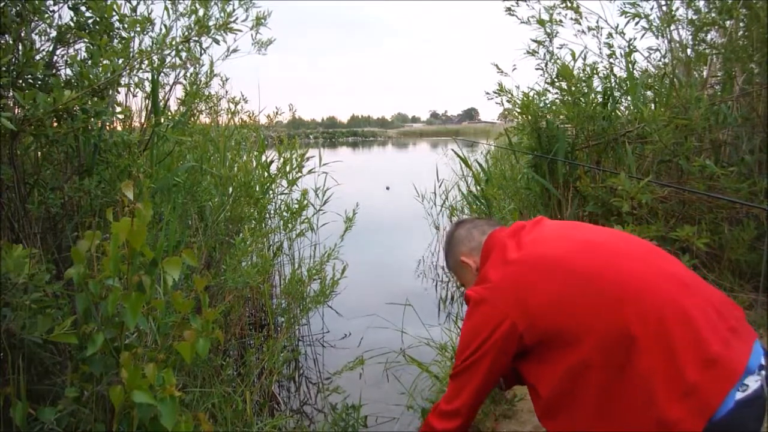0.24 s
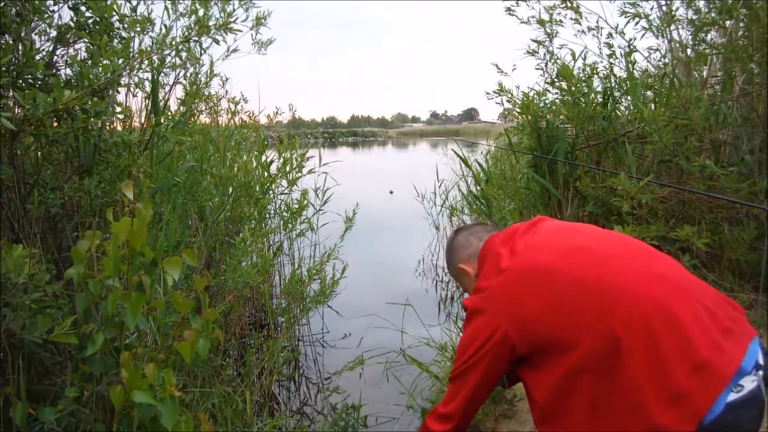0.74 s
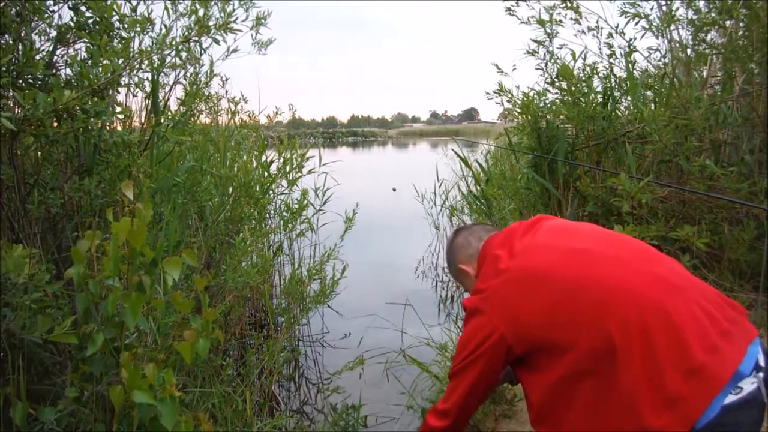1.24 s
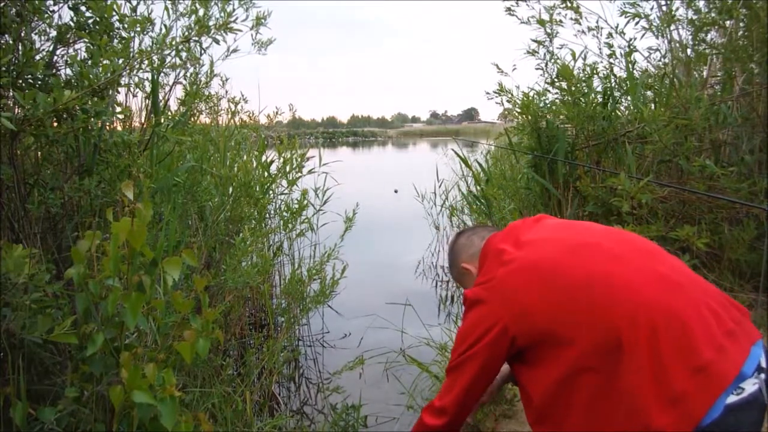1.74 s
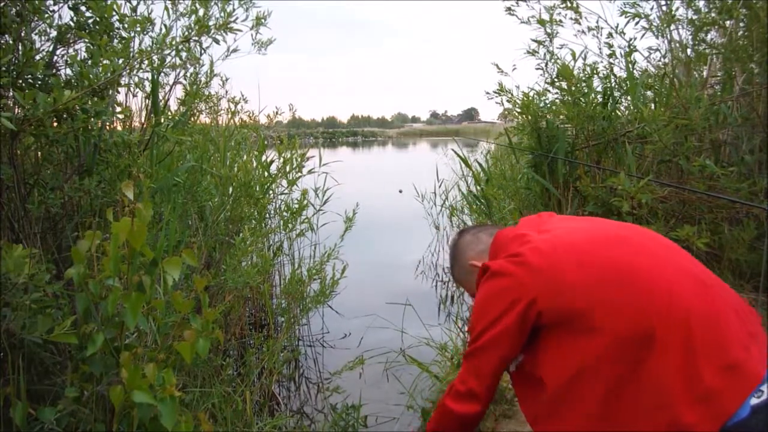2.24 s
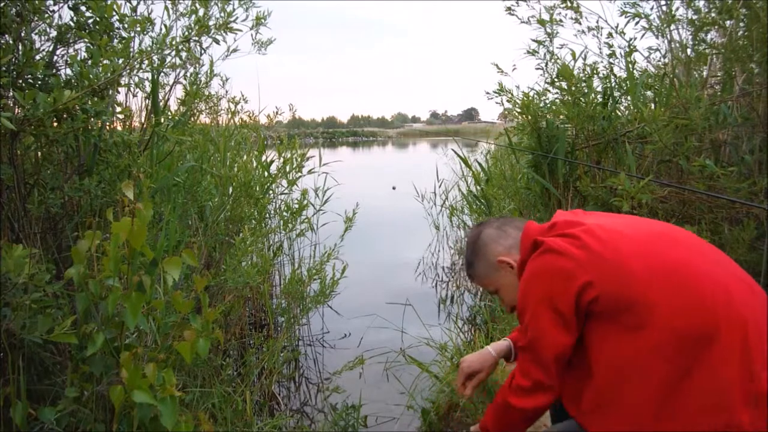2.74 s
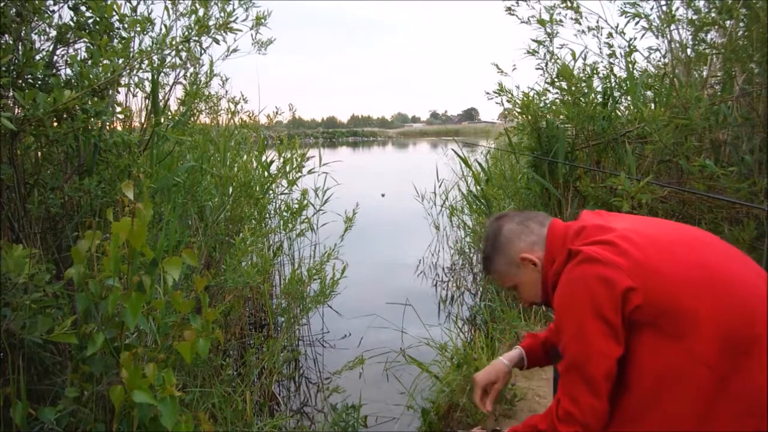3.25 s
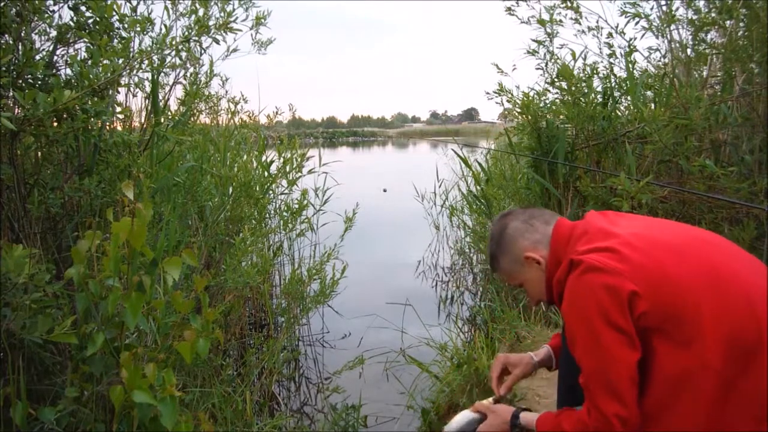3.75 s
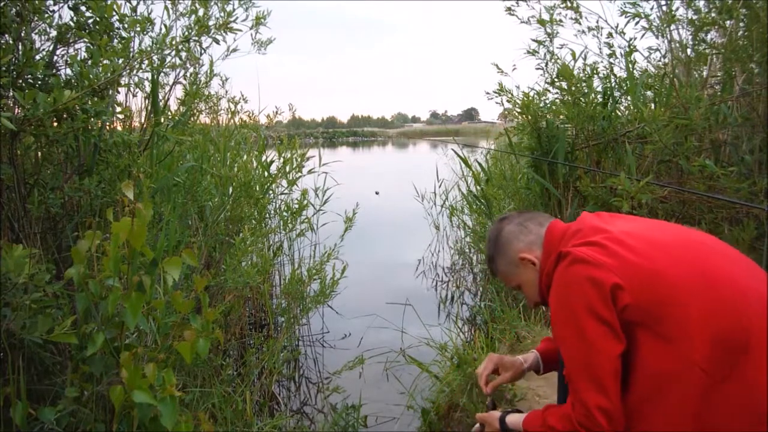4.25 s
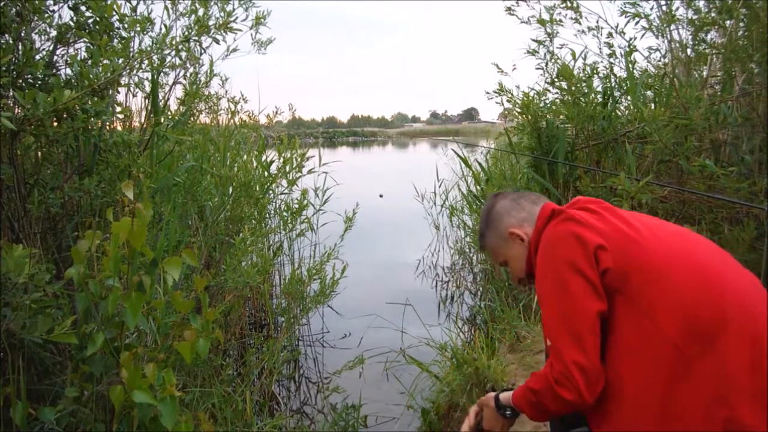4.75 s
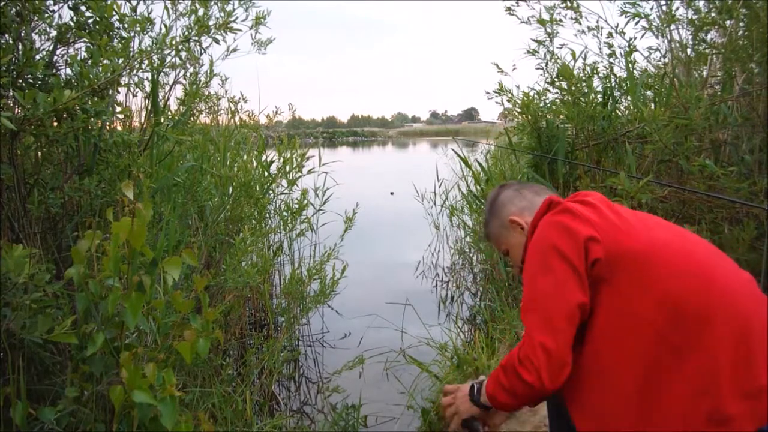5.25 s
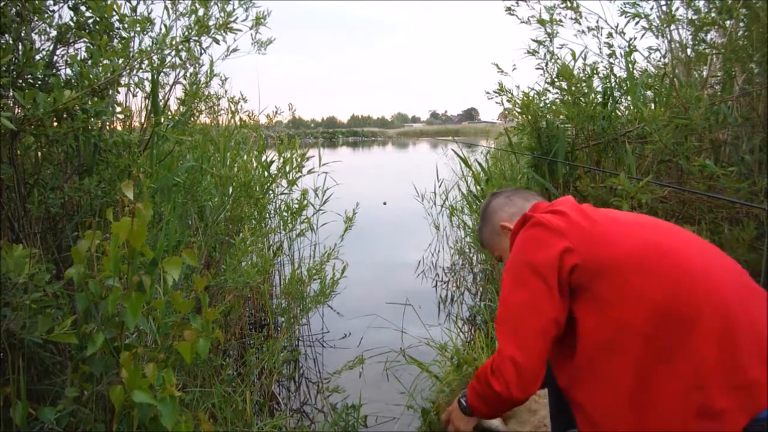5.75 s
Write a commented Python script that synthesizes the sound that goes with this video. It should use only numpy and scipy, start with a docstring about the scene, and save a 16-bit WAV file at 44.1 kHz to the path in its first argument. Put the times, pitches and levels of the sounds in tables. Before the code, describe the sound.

A colony of gulls screams without pause across a lake, nearer cries standing out over faint grass rustling and small clicks.

```python
"""A colony of water birds, most likely gulls, screams without pause across a reedy lake.
Heard from the bank, the nearer birds stand out with arched cries, clear or rasping: pulses from the
syrinx, shaped by throat and beak. The rest merge into one wavering band; another bird pipes thinly.
At the microphone someone crouching rustles the grass and makes a few small clicks, and the camera
adds a faint pulsing whine. Behind it all lies the steady wash of the open lakeside."""
import sys
import numpy as np
from scipy import signal
from scipy.fft import rfft, irfft, next_fast_len
from scipy.io import wavfile
from scipy.ndimage import uniform_filter1d

SR = 44100
rng = np.random.default_rng(int(sys.argv[2]) if len(sys.argv) > 2 else 0)


def store_wav(level_fs):
    """Save 16-bit WAV to argv[1]."""
    pcm = np.round(np.clip(np.atleast_2d(level_fs), -1, 1) * 32767)
    wavfile.write(sys.argv[1], SR, pcm.T.astype(np.int16))


N = 264379
TIME = np.arange(N) / SR


# Each row: start in seconds, length in seconds, top pitch in Hz, climb and drop as shares of that pitch,
# throat level in dB, rasp from 0 to 1, brightness in dB per octave, lower beak resonance in Hz and its
# level in dB, upper beak resonance in Hz and its level in dB.
GULL_CRIES = [ (-.06, 0.21, 960, .05, 0.026, -48, 0.7, -22, 3800, -70, 5600, -75),
              (.27, 0.28, 1069, 0.068, 0.028, -46.5, 0.37, -32, 4300, -61, 6500, -75),
              (.52, .29, 1076, .04, 0.049, -49, 0.68, -11, 2950, -53.5, 5400, -60.5),
              (.58, 0.15, 1012, 0.038, 0.011, -64, 0.19, -26, 4050, -64, 5000, -57),
              (.78, 0.23, 1036, 0.034, 0.053, -50, 0.79, -24, 3670, -67, 5000, -67),
              (0.989, .21, 1088, 0.094, 0.016, -47, 0.26, -24, 4400, -58, 5300, -69),
              (1.12, 0.49, 1174, 0.057, 0.053, -55, 0.96, -20, 2700, -50.5, 3840, -57.5),
              (1.18, 0.17, 996, 0.031, 0.013, -51, .15, -3, 4860, -55, 5630, -56),
              (1.26, .21, 1022, 0.018, 0.082, -49.5, .75, -5, 4060, -73, 5050, -57),
              (1.39, 0.26, 1060, 0.016, 0.091, -46.5, 0.83, -38, 4100, -76, 5300, -64),
              (1.815, 0.23, 973, .035, 0.059, -45.5, 0.48, -18, 3930, -57, 5830, -56.5),
              (1.85, 0.23, 1078, 0.029, 0.034, -54, .9, -10, 3000, -63, 5340, -59),
              (2, 0.22, 1087, 0.0083, 0.054, -53, 0.63, -23, 3800, -61, 5250, -61),
              (2.05, 0.23, 977, 0.012, 0.031, -48.5, 0.29, -32, 3800, -62, 5200, -77),
              (2.27, 0.24, 1012, 0.026, 0.029, -47.5, 0.8, -24, 4000, -67, 5200, -71),
              (2.52, 0.24, 1070, 0.077, 0.05, -44.5, 0.45, -38, 4070, -54, 5100, -57),
              (2.45, 0.29, 1108, 0.043, 0.034, -52, 0.69, -24, 3900, -60, 5560, -56.5),
              (2.74, .2, 963, 0.0089, 0.072, -46, 0.32, -33, 4000, -59.5, 6100, -65),
              (2.92, 0.21, 1029, 0.026, 0.017, -56, .7, -16, 4230, -69, 5500, -61.5),
              (3.085, 0.23, 1082, .04, 0.017, -47.5, 0.66, -19, 4030, -53, 7200, -65),
              (3.11, .2, 940, 0.044, 0.047, -51, 1, -9, 4750, -54, 6300, -61.5),
              (3.28, 0.21, 1035, 0.012, 0.16, -46.5, 0.29, -32, 4300, -56.5, 6550, -65.5),
              (3.57, .13, 1097, .046, 0.023, -47, 0.72, -11, 4430, -57, 6160, -74),
              (3.75, .3, 1052, 0.056, 0.043, -48.5, .3, -22, 2940, -57, 5200, -60),
              (3.79, 0.24, 1152, .04, 0.037, -56, 0.72, -24, 4400, -53.5, 6820, -63.5),
              (3.78, 0.22, 929, .04, 0.029, -49.5, 0.7, -24, 3760, -60, 6400, -65),
              (3.99, .2, 1060, 0.0039, 0.17, -43.5, 0.18, -42, 4060, -54.5, 6700, -74),
              (4.15, 0.16, 866, 0.0048, 0.062, -48, .15, -34, 3770, -65, 6500, -71),
              (4.35, 0.18, 1065, 0.0083, .13, -45.5, 0.22, -3, 5450, -57, 8600, -68.5),
              (4.37, .14, 1138, .01, 0.12, -55, 0.33, -11, 4600, -54.5, 5670, -60),
              (4.35, 0.22, 932, 0.026, 0.12, -51, .3, -14, 2900, -58, 3680, -57.5),
              (4.49, 0.099, 990, 0.024, 0.024, -45.5, 0.95, -32, 4000, -74, 5500, -63),
              (4.63, 0.2, 1118, 0.037, 0.034, -49, 0.66, -20, 4500, -55, 6450, -65),
              (4.68, 0.26, 1010, 0.0055, .06, -45.3, 0.43, -37, 2900, -60, 4130, -54.5),
              (4.88, .15, 1087, 0.0072, 0.052, -48, .45, -18, 4100, -51.5, 6400, -68),
              (4.99, 0.22, 1056, .03, 0.032, -45.5, 0.56, -9, 4750, -55.5, 5400, -58.5),
              (5.12, 0.25, 1087, 0.018, 0.041, -51, 0.63, -15, 2690, -58, 5540, -62),
              (5.25, 0.25, 1069, 0.0077, .14, -45, .15, -9.5, 4470, -53, 6050, -60.5),
              (5.42, 0.24, 938, 0.0041, 0.082, -44.5, 0.15, -43, 4280, -61.5, 5250, -69),
              (5.53, 0.17, 866, 0.0047, .08, -50, 0.25, -36, 4300, -63, 5200, -77),
              (5.65, 0.11, 937, 0.037, .014, -55, 0.61, -23, 4700, -57, 5670, -58),
              (5.74, 0.15, 936, 0.026, 0.044, -47.5, 0.89, -28, 3760, -60, 5050, -61),
              (5.89, 0.17, 1084, 0.087, 0.021, -43.5, 0.4, -13, 4400, -53, 7340, -78), ]

def near_gulls():
    """The birds nearest the microphone, each cry standing clear of the colony."""
    out = np.zeros(N)
    for start, *shape in GULL_CRIES:
        add(out, start, cry(*shape))
    return out


def cry(length, top_hz, climb, drop, db, rasp, bright_db, lower_hz, lower_db, upper_hz, upper_db):
    """One near cry: the throat tone plus two beak resonances that rise and fall with the pitch."""
    t, hz, swell = arch(length, top_hz, climb, drop)
    drive = syrinx(t, hz, rasp)
    opening = (hz / top_hz) ** .8
    lower = amp(lower_db) * unit(beak(drive, lower_hz * opening))
    upper = amp(upper_db) * unit(beak(drive, upper_hz * opening))
    return swell * (amp(db) * throat(drive, bright_db) + lower + upper)


def arch(length, top_hz, climb, drop, attack_s=.02, release_s=.042):
    """Time, pitch and swell of a call that climbs and drops again; the larger move takes longer."""
    t = np.arange(int(length * SR)) / SR
    climb, drop = np.maximum([climb, drop], 1e-3)
    crest = np.sqrt(climb) / (np.sqrt(climb) + np.sqrt(drop))
    before = np.maximum(1 - t / length / crest, 0)
    after = np.maximum((t / length - crest) / (1 - crest), 0)
    hz = top_hz * (1 - climb * before ** 1.7 - drop * after ** 1.5)
    ramp = np.minimum(t / attack_s, (length - t) / release_s)
    return t, hz, np.sin(np.pi / 2 * np.minimum(ramp, 1)) ** 2


# The voice breaks as it grows rough. Each row: rasp, period doubling, both from 0 to 1.
VOICE_BREAK = [(.1, .1), (.2, .5), (1, .65)]

def syrinx(t, hz, rasp, harmonics=11, flutter_hz=68.25, flutter_db=7.5):
    """Pulses at the cry's pitch; rasp shakes them, splits them into strong and weak, and adds hiss."""
    flutter_turns = np.cumsum(flutter_hz * (1 + .06 * wander(t, 40))) / SR
    flutter = np.sin(2 * np.pi * (flutter_turns + rng.random()))
    hz = hz * (1 + .005 * wander(t, 70) + rasp * (.03 * flutter + .028 * wander(t, 900)))
    turns = np.cumsum(hz) / SR + 2 * rng.random()
    offset = turns % 1 - .5
    pulses = np.sinc((2 * harmonics + 1) * offset) / np.sinc(offset)
    doubling = np.interp(rasp, *np.transpose(VOICE_BREAK))
    pulses *= 1 + doubling * (np.sin(np.pi * turns) + .5 * wander(t, 1000))
    puffs = np.cos(np.pi * offset) * rng.standard_normal(len(t))
    shake = amp(flutter_db * rasp * flutter + 1.6 * wander(t, 45))
    return (unit(pulses) + .5 * rasp * unit(puffs)) * shake


# A gull's throat. Each row: frequency in Hz, gain in dB.
THROAT_COLOUR = [(450, -50), (1000, -24.5), (1450, -15), (1750, 0.5), (2100, -1.5), (2600, -7.5),
                 (3200, -10), (3900, -7), (4600, -14), (5400, -17), (6200, -12), (7000, -24), (8200, -12),
                 (9000, -25), (11000, -52)]

def throat(drive, bright_db):
    """The throat brings out the second harmonic; a duller cry loses more above it."""
    def gain_db(hz):
        octaves_above = np.log2(np.maximum(hz / 2200, 1))
        return read(THROAT_COLOUR, hz) + bright_db * octaves_above - 40 * (hz < 300)
    return unit(coloured(drive, gain_db, lag=1.5e-7))


def beak(drive, hz, width_hz=750):
    """A steep resonance of the beak that follows the curve hz."""
    carrier = np.exp(2j * np.pi * np.cumsum(hz) / SR)
    pole = np.exp(-np.pi * width_hz / SR)
    ringing = signal.lfilter([(1 - pole) ** 2], [1, -2 * pole, pole * pole], drive / carrier)
    return 2 * (carrier * ringing).real


# Each row: start in seconds, length in seconds, top pitch in Hz, level in dB.
PIPING_NOTES = [(.01, .15, 3260, -56.5), (0.158, .14, 3220, -62), (3.418, 0.21, 3360, -57.5),
                (4.805, 0.15, 3380, -60), (4.91, .13, 3200, -54.5), (5.08, 0.15, 3390, -62),
                (5.297, 0.11, 3370, -58)]

def piping_bird():
    """Another bird near the bank pipes thin, slightly arched, almost pure notes."""
    out = np.zeros(N)
    for start, length, top_hz, db in PIPING_NOTES:
        t, hz, swell = arch(length, top_hz, climb=.0448, drop=.0436)
        turns = np.cumsum(hz * (1 + .0025 * wander(t, 298))) / SR
        add(out, start, amp(db) * swell * unit(np.sin(2 * np.pi * turns)))
    return out


# The long path across the lake. Each row: frequency in Hz, gain in dB.
LAKE_PATH = [(500, 14), (1000, 10), (1350, 17), (1700, 7), (2100, 5.5), (2600, 4), (4000, -4), (6000, -7.5),
             (7200, -17), (9000, -40)]

def far_colony(near, count=420, island_count=5, mean_hz=920, spread=.19, glide=.16, level_db=-43.5):
    """Hundreds of cries from distant nesting islands, dulled and blurred on their way to the bank."""
    islands = np.zeros((island_count, N))
    for k, (when, long, high, faint, harsh, rising) in enumerate(rng.random((count, 6))):
        top_hz = mean_hz * (1 + spread * (2 * high - 1))
        t, hz, swell = arch(.18 + .2 * long, top_hz, glide * rising, glide * (1 - rising))
        voice = throat(syrinx(t, hz, rasp=.438 + .5 * harsh), bright_db=0)
        start = (k + when) / count * (N / SR + .3) - .3
        add(islands[k % island_count], start, amp(-8 * faint) * swell * voice)
    blurred = sum(shore(island, wet_db=-.5) for island in islands)
    dulled = coloured(blurred, lambda f: read(LAKE_PATH, f))
    return amp(level_db) * unit(dulled * amp(clamour_db(near)))


# The far colony's slow drift. Each row: time in seconds, relative level in dB.
COLONY_DRIFT = [(0, 3), (.2, 2), (.38, 2.5), (.55, 2), (1.1, 3.5), (1.5, 4.5), (1.76, 3.7), (2.05, 5),
                (2.27, 3), (2.65, 3.5), (2.88, 4.5), (3, 2.5), (3.3, 4.5), (3.52, 1), (3.7, 3), (3.87, 6.5),
                (4.1, 1.5), (4.3, 2.5), (4.45, 0.5), (4.6, 3), (4.75, 2.5), (5.2, -0.5), (5.4, 1.5),
                (5.7, 0), (6, 1.2)]

def clamour_db(near, join_in=.059, average_s=.078):
    """The far colony drifts in level and swells a little whenever the near birds scream."""
    near_power = uniform_filter1d(unit(near) ** 2, int(average_s * SR))
    return np.interp(TIME, *np.transpose(COLONY_DRIFT)) + join_in * 10 * np.log10(near_power + .088)


# Dying away over water and reeds. Each row: frequency in Hz, time to fall 60 dB in seconds.
SHORE_DECAY = [(500, 1), (2000, 0.42), (5000, 0.59), (10000, 0.17)]

def shore(x, wet_db, echoes_per_s=2000):
    """Sound reaches the microphone directly and scattered by reeds and banks, the treble dying first."""
    t = np.arange(SR) / SR
    echoes = rng.choice([-1., 1.], SR) * (rng.random(SR) < echoes_per_s / SR) * (t > .004)
    hz, age, spectrum = signal.stft(echoes, SR, nperseg=256)
    decay = amp(-60 * age / read(SHORE_DECAY, hz)[:, None])
    tail = signal.istft(spectrum * decay, SR, nperseg=256)[1]
    tail /= np.linalg.norm(tail)
    return x + amp(wet_db) * signal.fftconvolve(x, tail)[:N]


# Each row: time in seconds, peak level in dB.
HANDLING_CLICKS = [(.836, -44), (1.444, -42), (2.064, -56), (2.565, -50), (2.6893, -52), (2.724, -35),
                   (3.222, -52), (3.886, -44), (4.863, -34), (4.8858, -39), (5.045, -50)]
# The colour of a click. Each row: frequency in Hz, gain in dB.
SNAP_COLOUR = [(300, -42), (2000, 3), (5000, 5), (10000, 8), (15000, 3)]

def handling():
    """Small dry clicks of handling close to the microphone, each one sharp snap."""
    out = np.zeros(N)
    snap = coloured(signal.unit_impulse(1024, "mid"), lambda f: read(SNAP_COLOUR, f))
    for time, db in HANDLING_CLICKS:
        add(out, time - len(snap) / 2 / SR, amp(db) * snap / abs(snap).max())
    return out


# Hands stirring the grass. Each row: time in seconds, level in dB.
RUSTLE_LEVEL = [(0, -74), (.4, -79), (.5, -70), (.62, -72), (.8, -71), (1.05, -76), (1.4, -84), (1.65, -80),
                (1.95, -75), (2.3, -84), (2.68, -72), (2.9, -102), (6, -107)]
# The colour of the blades. Each row: frequency in Hz, gain in dB.
GRASS_COLOUR = [(1500, -35), (5000, -19), (8500, 7), (11000, -2), (15000, -23)]

def grass(ticks_per_s=1200, spread_db=3.5, clump_db=3.5):
    """Beside the microphone, blades of grass tick against the hands in small clumps."""
    sizes = amp(spread_db * np.minimum(rng.exponential(size=N), 4) + clump_db * wander(TIME, 21))
    ticks = sizes * rng.choice([-1., 1.], N) * (rng.random(N) < ticks_per_s / SR)
    rustle = unit(coloured(ticks, lambda f: read(GRASS_COLOUR, f)))
    return amp(np.interp(TIME, *np.transpose(RUSTLE_LEVEL))) * rustle


def camera_whine(level_db=-80, tones_hz=(11215, 11405), pairs_per_s=29.97):
    """Right at the microphone, the camera's electronics whistle on two tones in paired soft bursts."""
    cycle_s = ((TIME * pairs_per_s + .54) % 1 - .5) / pairs_per_s
    bursts = .3 + np.exp(-((abs(cycle_s) - .005) / .003) ** 2)
    low, high = (np.sin(2 * np.pi * np.cumsum(hz + 28 * wander(TIME, 150)) / SR) for hz in tones_hz)
    return amp(level_db) * unit((low + .36 * high) * bursts)


# The open air at the bank. Each row: frequency in Hz, gain in dB.
AIR_COLOUR = [(15, -23), (30, -25), (70, -15.5), (140, -12), (400, -9.5), (700, -4), (1000, 0.5),
              (2000, -3), (3200, -8), (4500, -6), (6300, -13.5), (8000, -21), (10000, -29), (15500, -38)]

def lakeside_air(wash_db=-50.5, drone_db=-80.5, drone_hz=155):
    """The steady wash of the open lakeside, with a faint drone far off."""
    wash = unit(coloured(rng.standard_normal(N), lambda f: read(AIR_COLOUR, f)))
    drone = np.sin(2 * np.pi * np.cumsum(drone_hz + 2 * wander(TIME, 25.5)) / SR)
    drone *= 1 + .89 * wander(TIME, 2.08)
    return amp(wash_db) * wash + amp(drone_db) * drone


def amp(db):
    """Decibels to gain."""
    return 10 ** (np.asarray(db) / 20)


def unit(x):
    """Scales to an rms of one."""
    return x / np.sqrt(np.mean(x ** 2) + 1e-20)


def read(points, hz):
    """Reads a table on a log-frequency axis."""
    f, value = np.transpose(points)
    return np.interp(np.log(hz + 1), np.log(f + 1), value)


def coloured(x, db_at, lag=0):
    """Filters x by a function from Hz to dB; a lag in seconds per Hz smears sharp pulses."""
    size = next_fast_len(len(x))
    hz = np.fft.rfftfreq(size, 1 / SR)
    response = amp(db_at(hz)) * np.exp(-1j * np.pi * lag * hz ** 2)
    return irfft(rfft(x, size) * response, size)[:len(x)]


def wander(t, per_s):
    """A random curve that glides through per_s new values a second."""
    knots = rng.standard_normal(size=2048)
    return np.interp(t * per_s, np.arange(len(knots)), knots)


def add(mix, start_s, sound):
    """Mixes a sound in at start_s, trimming what falls outside the mix."""
    start = round(start_s * SR)
    sound = sound[max(-start, 0):]
    part = mix[max(start, 0):][:len(sound)]
    part += sound[:len(part)]


def scene():
    """The lake from one microphone on the bank."""
    near = shore(near_gulls() + piping_bird(), wet_db=-9.5)
    bank = lakeside_air() + camera_whine() + handling() + grass()
    return (near + far_colony(near) + bank)[None]


def record(dry, edge_hz=15730):
    """The recorder's band limit cuts off the highest treble."""
    lowpass = signal.firwin(767, edge_hz, window=("kaiser", 9), fs=SR)
    return signal.oaconvolve(dry, lowpass[None], "same")


dry = scene()
out = record(dry)
store_wav(out)
```